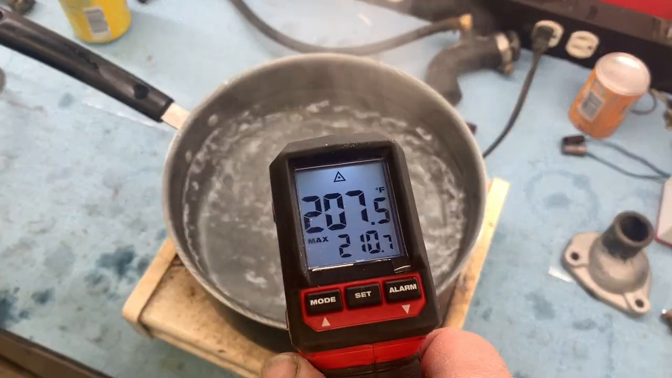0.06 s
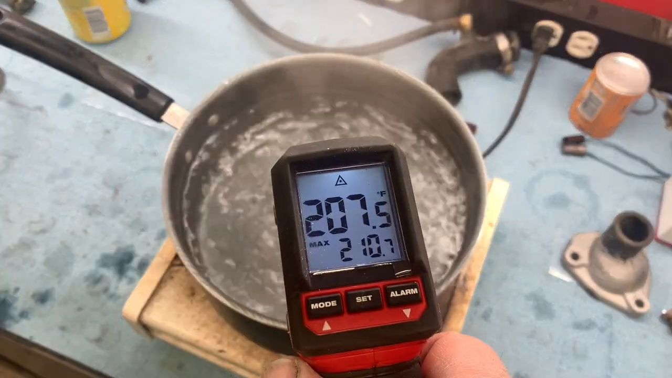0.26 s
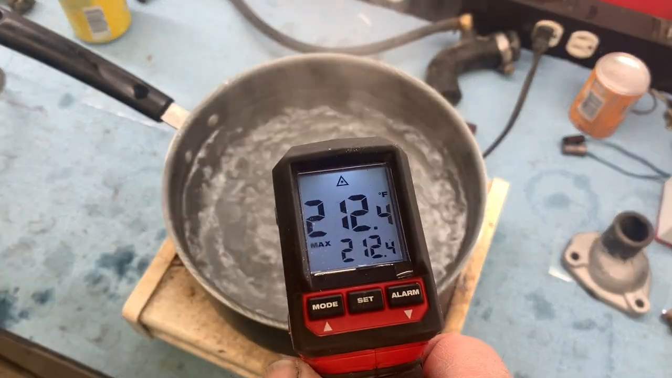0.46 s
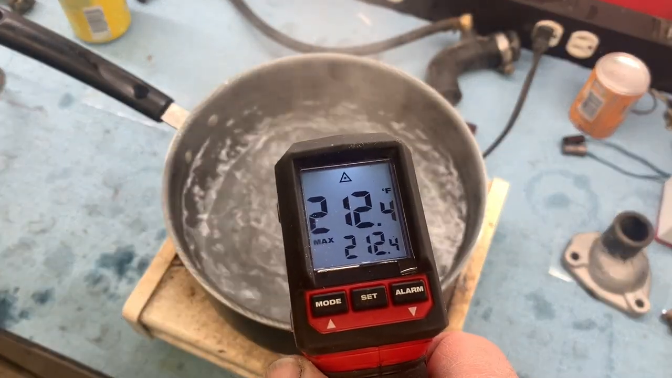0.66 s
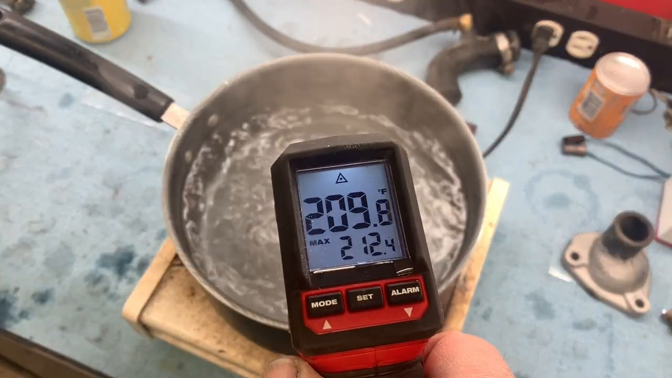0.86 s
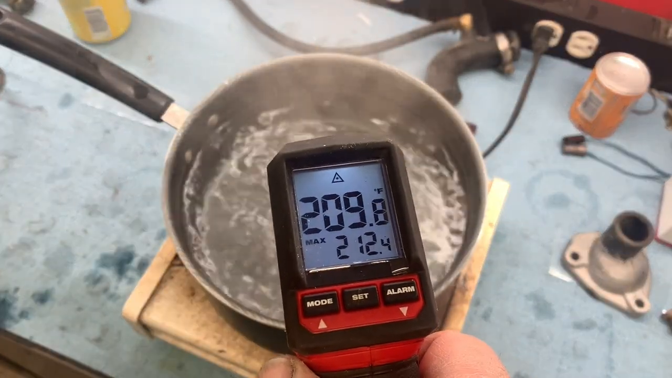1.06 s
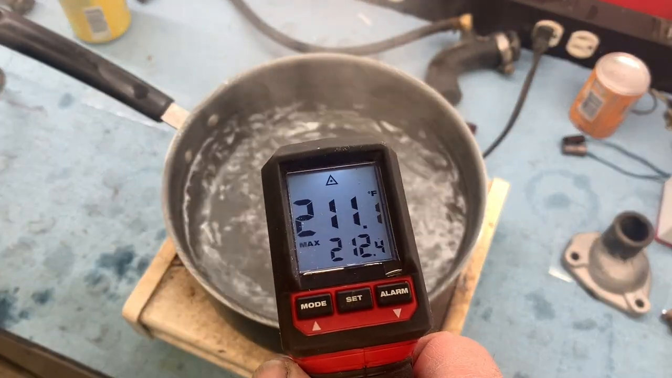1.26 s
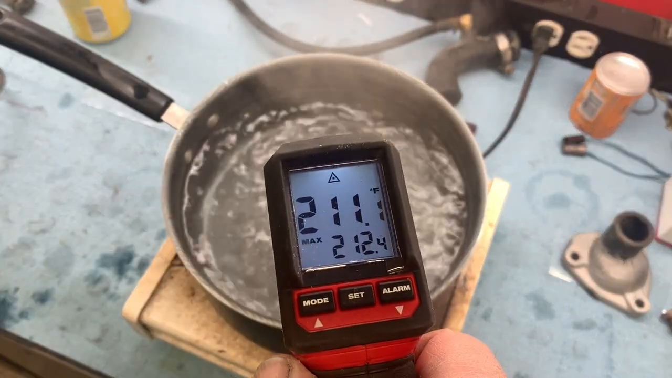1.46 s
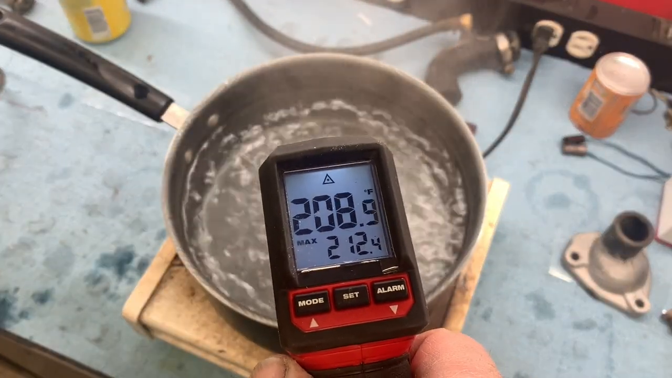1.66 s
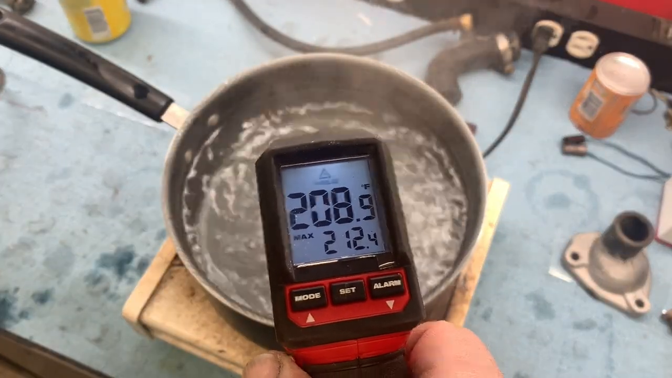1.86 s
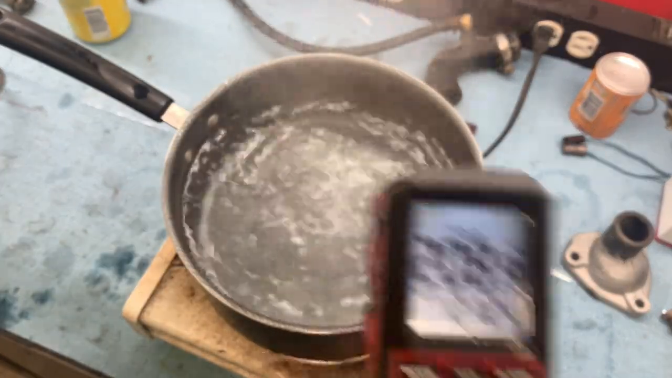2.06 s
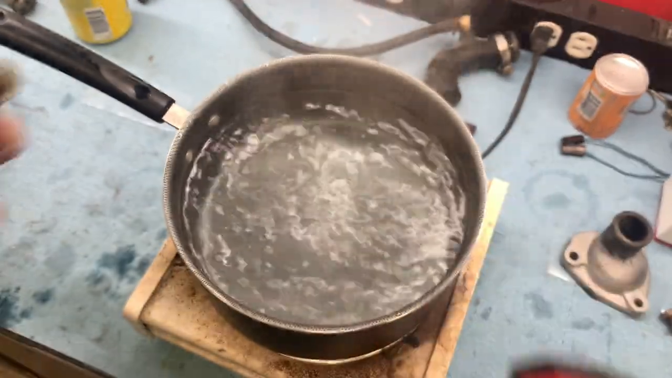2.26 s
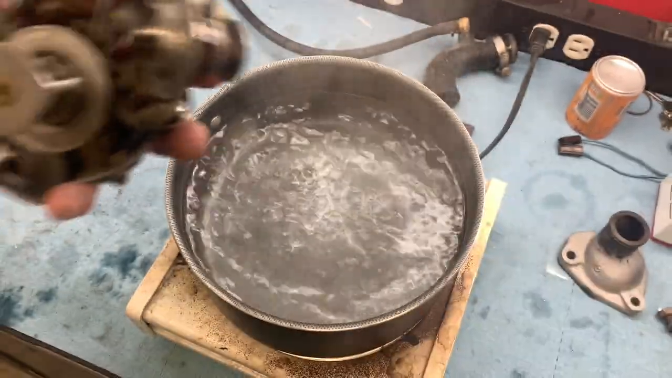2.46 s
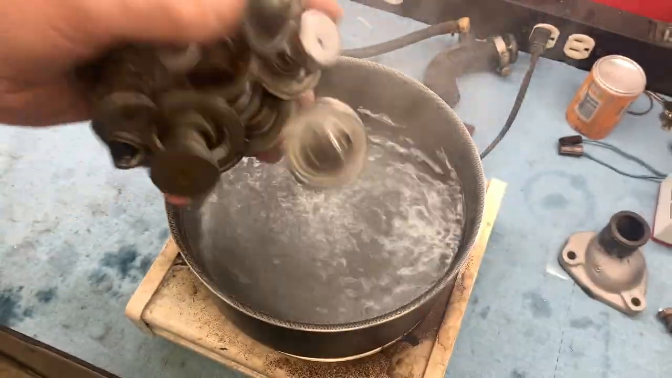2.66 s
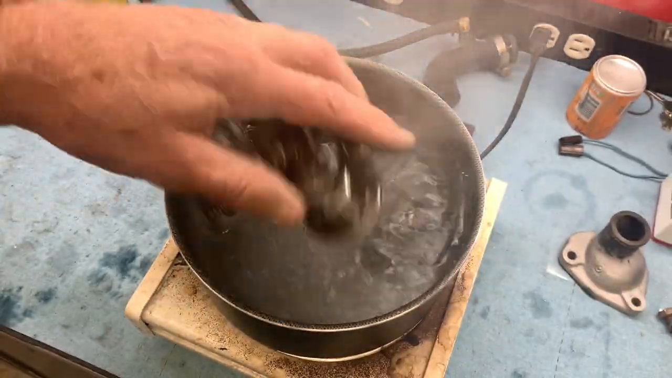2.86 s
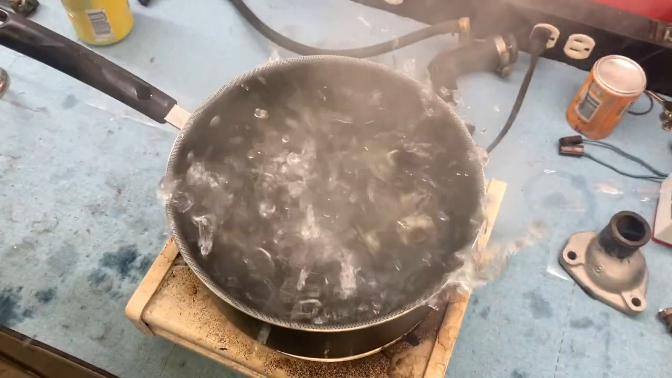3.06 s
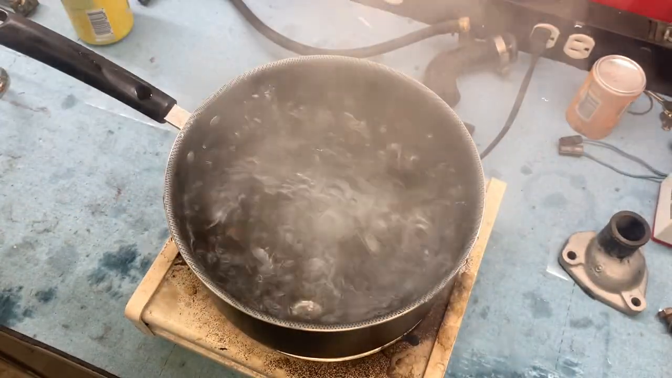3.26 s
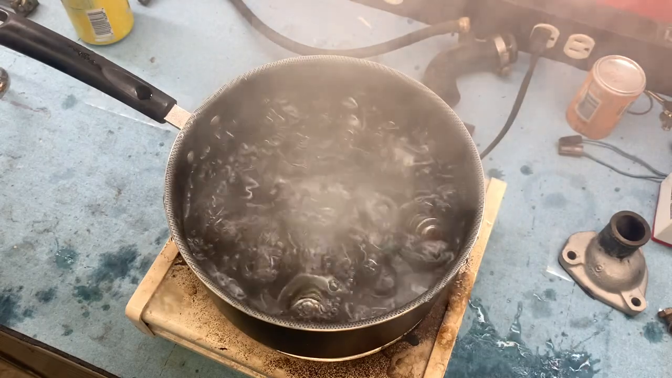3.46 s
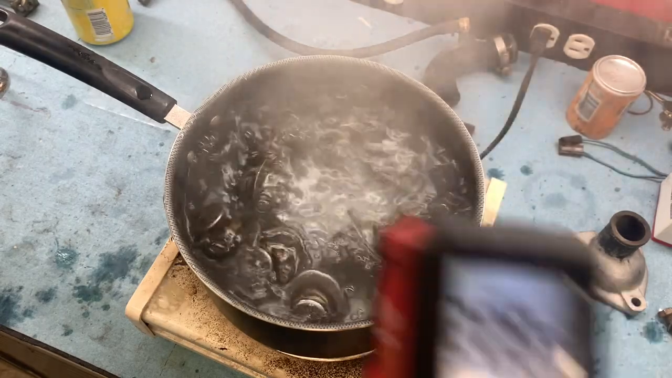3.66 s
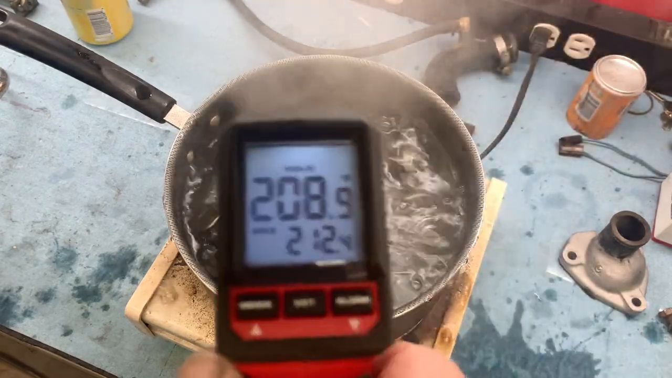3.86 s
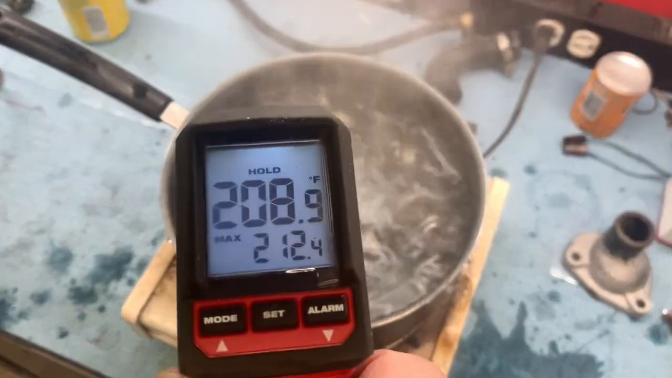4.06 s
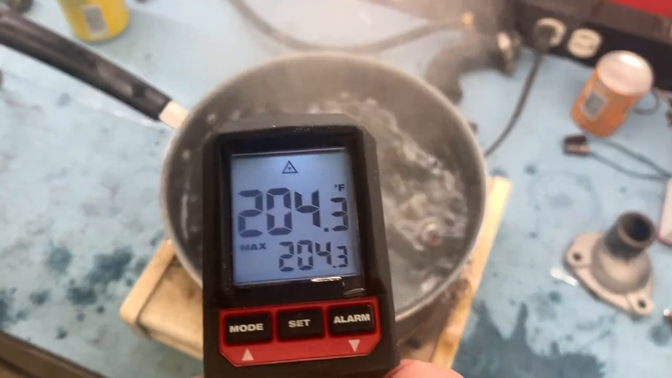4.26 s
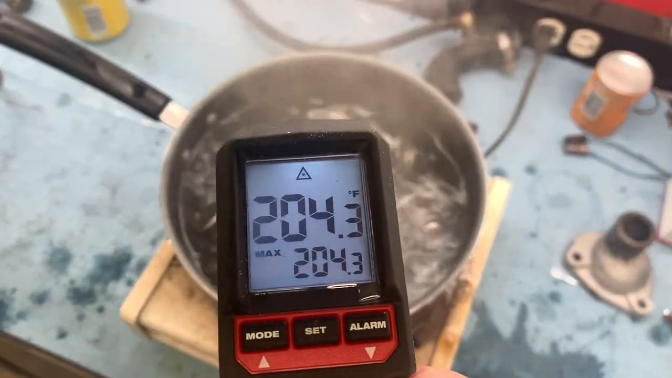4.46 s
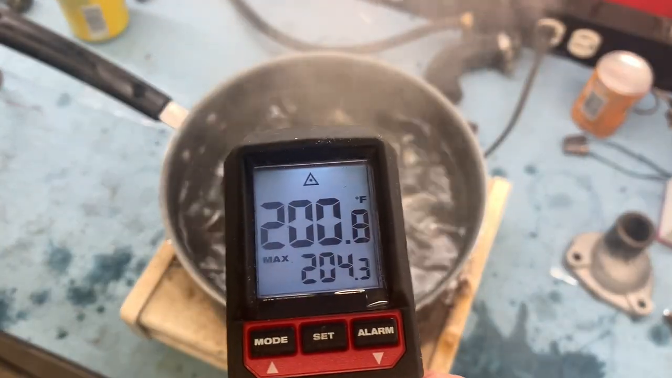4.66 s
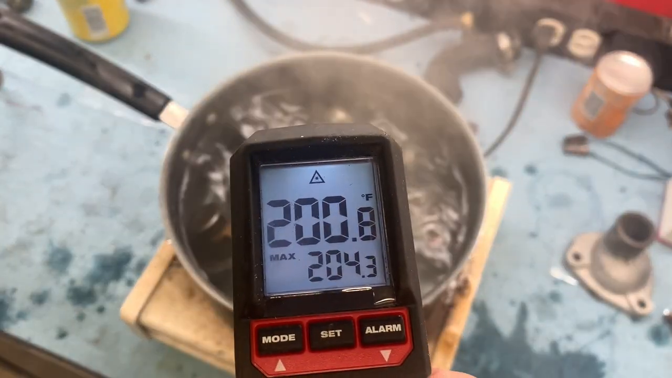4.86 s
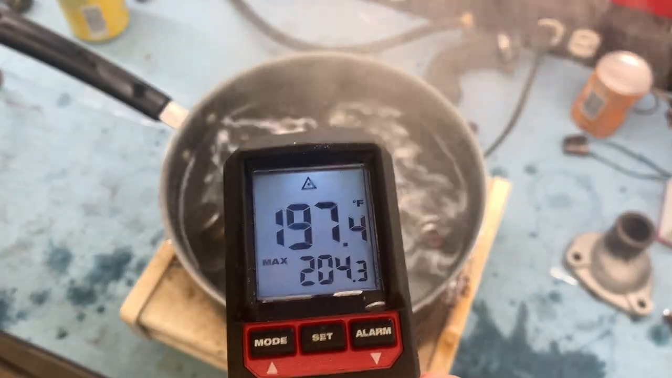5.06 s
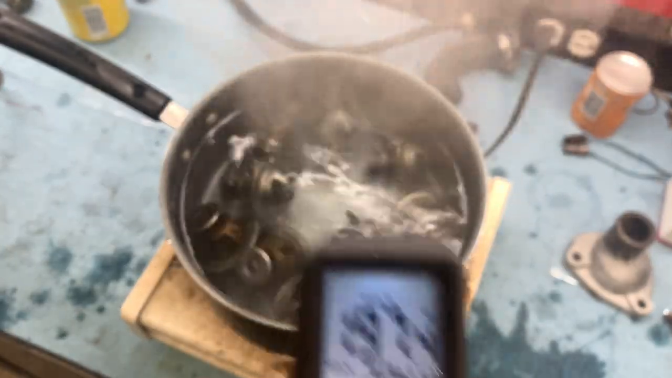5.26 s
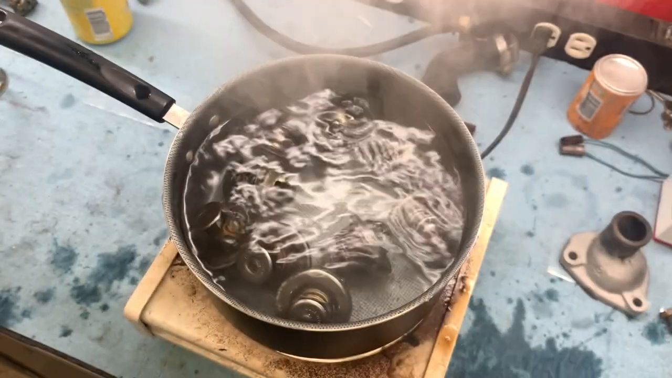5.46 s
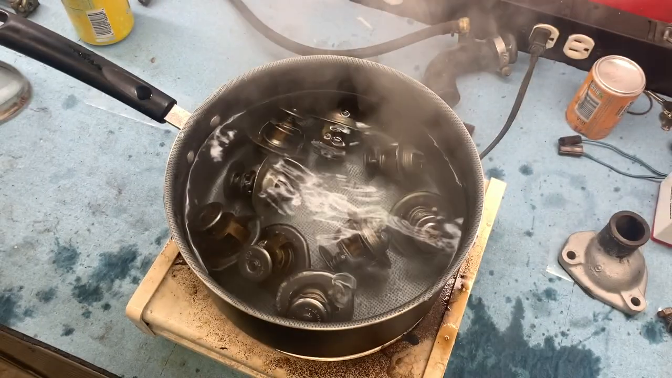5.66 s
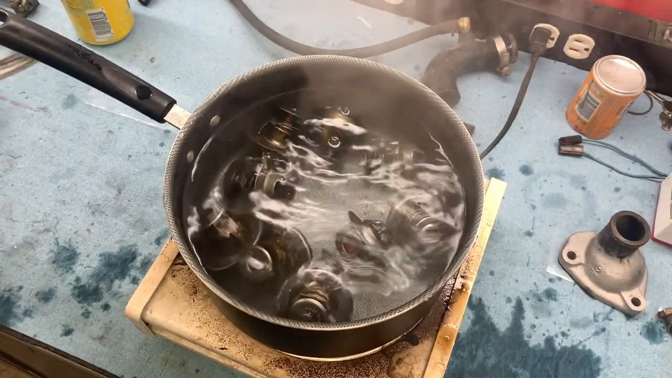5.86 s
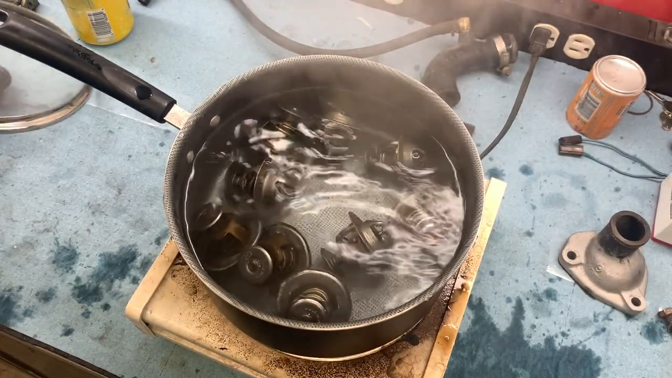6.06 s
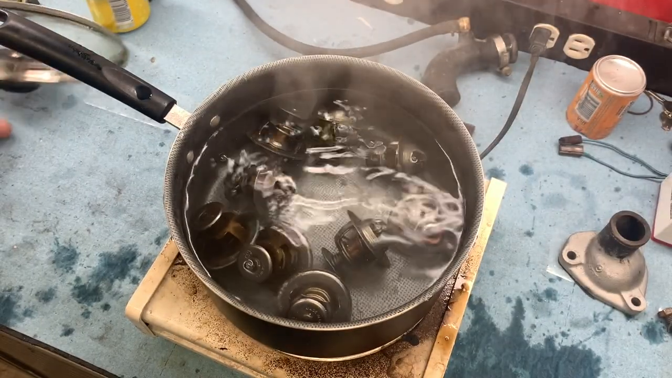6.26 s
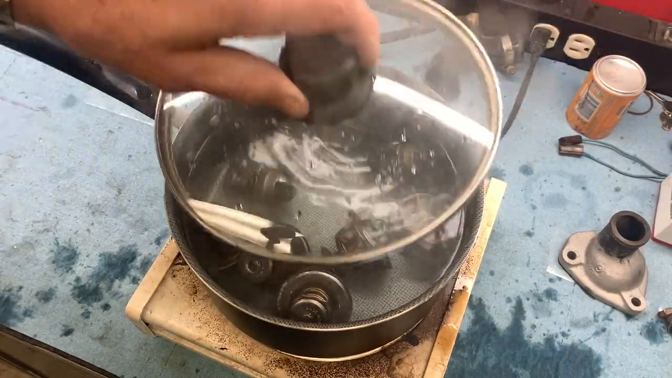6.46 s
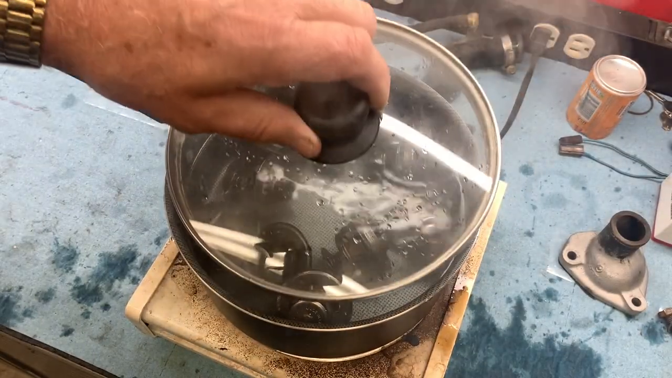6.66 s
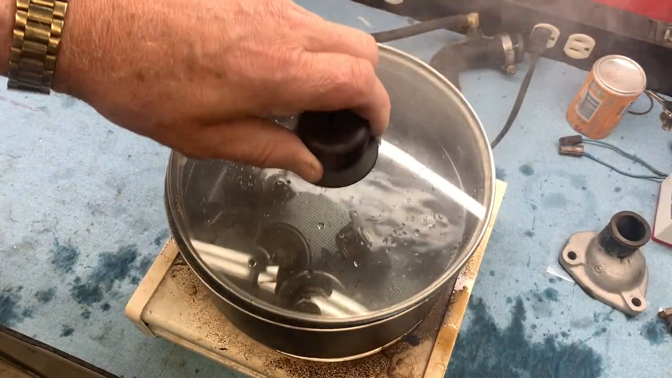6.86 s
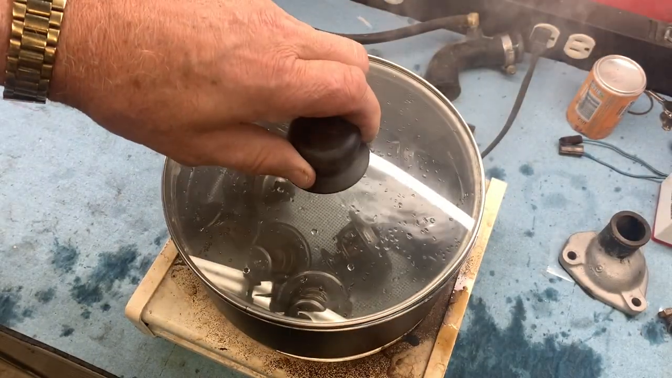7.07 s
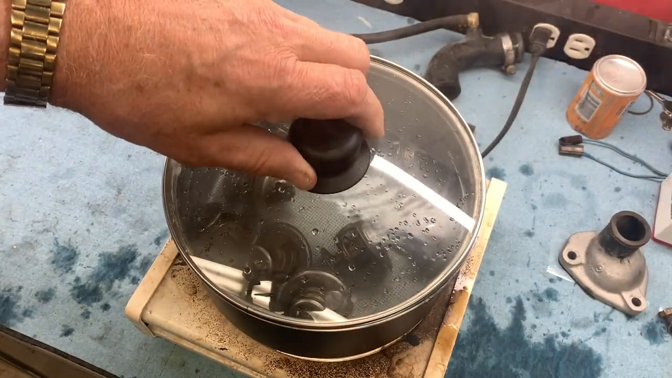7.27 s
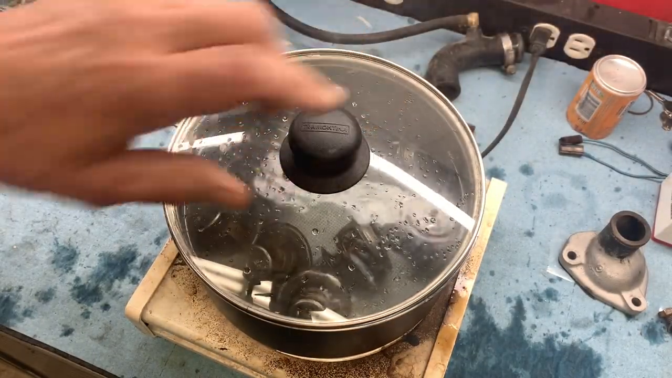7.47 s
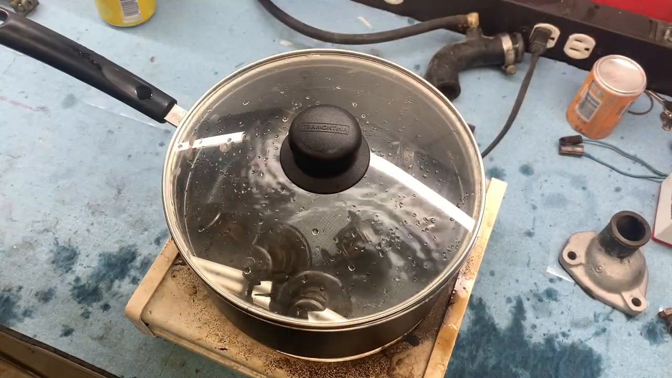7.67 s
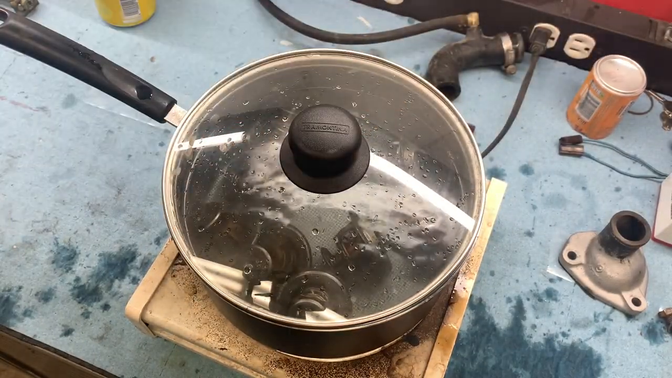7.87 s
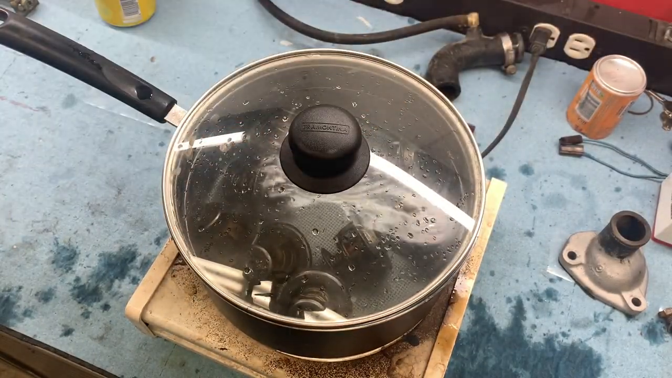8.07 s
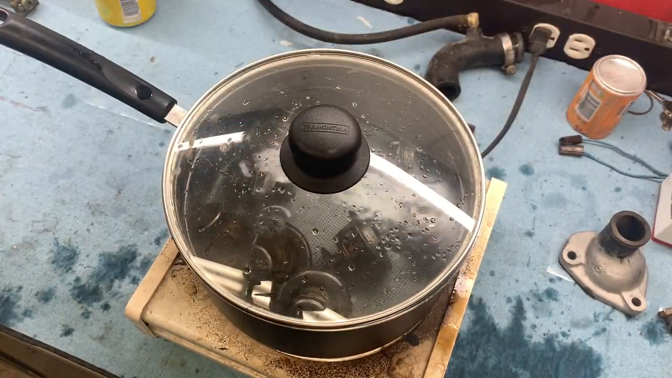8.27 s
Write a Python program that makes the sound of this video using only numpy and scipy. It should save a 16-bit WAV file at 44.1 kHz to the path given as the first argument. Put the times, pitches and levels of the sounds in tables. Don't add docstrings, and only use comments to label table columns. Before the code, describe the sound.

Metal parts clink in a hand, then clatter and splash into a simmering saucepan; hissing water fades to tapping, spitting drops before a glass lid goes on.

```python
import sys
import numpy as np
from scipy import signal
from scipy.fft import rfft, irfft, next_fast_len
from scipy.io import wavfile
from scipy.ndimage import uniform_filter1d

SR = 44100
rng = np.random.default_rng(int(sys.argv[2]) if len(sys.argv) > 2 else 0)


def natural_amplitude(level_db):
    exponent = np.asarray(level_db, float) / 20
    return 10 ** exponent


def wav_record(signal):
    frames = np.transpose(np.atleast_2d(signal))
    bounded = np.clip(frames, -1, 1)
    quanta = np.round(bounded * 32767).astype(np.int16)
    wavfile.write(sys.argv[1], SR, quanta)


N = 366912
LENGTH = next_fast_len(N + SR)
HZ = np.arange(LENGTH // 2 + 1) * SR / LENGTH


def level(x, db):
    return x * natural_amplitude(db) / np.sqrt(np.mean(x ** 2))


def curve(table):
    s, db = np.transpose(table)
    return np.interp(np.arange(N) / SR, s, db)


def gain(points):
    hz, db = np.transpose(points)
    return natural_amplitude(np.interp(np.log(HZ + 1), np.log(hz), db))


def shape(x, response):
    return irfft(rfft(x, LENGTH) * response, LENGTH)[..., :N]


def band(x, lo_hz, hi_hz):
    return signal.sosfilt(signal.butter(2, [lo_hz, hi_hz], "bandpass", fs=SR, output="sos"), x)


def walk(rate):
    k = int(SR / rate)
    held = np.repeat(rng.standard_normal(N // k + 1), k)
    return 1.3 * uniform_filter1d(uniform_filter1d(held, k), k)[:N]


def bursts(s, db, t60, rise_s, bend=0.95):
    out, t = np.zeros(N + SR), np.arange(SR // 4) / SR
    for start, peak, fade in zip(s, db, t60):
        fall = natural_amplitude(peak - 60 * (t / max(fade, .004)) ** bend)
        out[int(start * SR):][:len(t)] += fall * np.minimum(t / rise_s, 1)
    return out[:N]


def ring(push, modes):
    t = np.arange(SR // 3) / SR
    tones = sum(natural_amplitude(db - 60 * t / t60) * np.sin(2 * np.pi * hz * t) for hz, db, t60 in modes)
    return signal.fftconvolve(push, tones)[:N]


def scattered(x):
    z = signal.stft(x, nperseg=256)[2]
    turned = z * np.exp(2j * np.pi * rng.random(z.shape))
    return np.sqrt(2) * signal.istft(turned, nperseg=256)[1][:N]


# (pitch_hz, width_hz, lift_db)
PAN_RESONANCES = [(257, 35, 10), (357.7, 26, 12), (489, 48, 9), (1020, 170, 5), (7070, 1000, 2),
                  (14100, 830, 4.5)]


def pan():
    return 1 + sum((natural_amplitude(db) - 1) / (1 + 2j * (HZ - hz) / width) for hz, width, db in PAN_RESONANCES)


# (start_s, level_db)
DRONE_SWELLS = [(0.0, -40), (0.69, -34.5), (1.32, -56), (1.55, -45.5), (1.81, -37), (2.25, -44.5),
                (3.54, -34.5), (4.12, -43.5), (4.31, -59), (4.45, -42.5), (4.63, -61), (4.75, -43.5),
                (5.23, -55.5), (5.65, -42), (5.9, -53), (6.1, -49.5), (7.55, -60.5), (8.32, -44.5)]
# (times_the_pitch, level_db)
DRONE_OVERTONES = [(2, -15.5), (3.8, -20.5)]
# (pitch_hz, level_db)
RUMBLE_COLOUR = [(20, -33), (35, -21), (60, 16.5), (90, 6), (130, -6.5), (200, -7), (300, -41)]


def drone():
    hz = 64.9 - np.interp(np.arange(N) / SR, (2.6, 5.8), [0, 4.5])
    turn = 2 * np.pi * np.cumsum(hz + 1.0 * walk(11)) / SR
    tone = np.sqrt(2) * np.sin(turn) * natural_amplitude(curve(DRONE_SWELLS) + 0.4 * walk(22))
    overtones = sum(natural_amplitude(db - 43 + 2.87 * walk(6.0)) * np.sin(times * turn) for times, db in DRONE_OVERTONES)
    rumble = level(shape(rng.standard_normal(N), gain(RUMBLE_COLOUR)), -54.5)
    return tone + overtones + rumble


# (start_s, level_db)
WATER_CHURN = [
    (0.0, -61),
    (2.62, -60),
    (2.86, -45.5),
    (2.94, -46),
    (3.08, -48),
    (3.2, -45),
    (3.61, -52),
    (5.35, -56.5),
    (8.32, -58.5),
]
# (pitch_hz, level_db)
WATER_COLOUR = [(100, 6.5), (250, -10.5), (500, -5), (780, -6.5), (1300, -7.5), (1900, -15), (2700, -18.5),
                (5500, -25), (10000, -22.5), (14000, -17)]
# (pitch_hz, width_hz, level_db, share_of_churn_followed)
SINGING_WALLS = [(1041, 98, -5, 2.43), (2258, 116.5, 4, 1.5)]


def boil():
    bubbles, t = np.zeros(N + SR), np.arange(SR // 20) / SR
    for when, pitch, size in rng.random((900, 3)):
        hz = 220 * 9.0 ** pitch
        decay = hz / 2.7
        glide = np.sin(2 * np.pi * hz * t * (1 + 0.056 * decay * t))
        bubbles[int(when * N):][:len(t)] += natural_amplitude(8.4 * size) * np.exp(-decay * t) * glide
    seethe = rng.standard_normal((2, N)) * natural_amplitude(1.1 * walk(20))
    colour = gain(WATER_COLOUR) * pan()
    water = level(shape(seethe[0], colour), 4.9) + level(shape(bubbles[:N], colour), -9.0)
    water_db = curve(WATER_CHURN)

    stir_db = np.minimum(water_db - WATER_CHURN[0][1], 5)
    walls = 0
    for hz, width, db, share in SINGING_WALLS:
        tone = shape(seethe[1], 1 / (1 + 2j * (HZ - hz) / width) ** 2)
        walls = walls + level(tone, db) * natural_amplitude(share * stir_db)
    time = np.arange(N) / SR
    wall_db = -66 + np.interp(time, (5.07, 5.95), [0, 7.5])
    cover_db = np.interp(time, [6.18, 6.3], [0, -14])
    return water * natural_amplitude(water_db), walls * natural_amplitude(wall_db + cover_db + 0.41 * walk(24))


# (start_s,
# crack_db, floor_db, wall_db)
BLOWS = [(2.3205, -41, -61, -77), (2.3341, -30.5, -63, -80), (2.5837, -33, -59, -55),
         (2.607, -35.5, -66, -66), (2.6377, -16, -72, -38), (2.6652, -31, -51, -53),
         (2.7305, -38, -45, -66), (2.744, -21, -36, -50), (2.7755, -6.5, -2, -22.5),
         (2.785, -19, -43, -18.5), (2.8484, -22.5, -32, -32.5), (2.8606, -20, -26.5, -48),
         (2.9173, -6.5, -16, -22), (2.9282, -14, -16.5, -17.5), (2.9483, -7, -13.5, -19),
         (2.9754, -13.5, -22, -20.5), (2.9959, -9.5, -19.5, -16.5), (3.0289, -21, -20.5, -29),
         (3.0519, -13, -15, -26), (3.101, -27, -16.5, -22), (3.1277, -29, -37, -30),
         (3.1594, -25.5, -18.5, -36), (3.2067, -53, -30, -63), (3.2565, -64, -49, -32),
         (1.8404, -43, -46.5, -48), (1.854, -42, -62, -45), (3.9609, -52, -59, -35),
              (4.8985, -44, -64, -43.5), (5.024, -37, -51, -42), (5.257, -39, -37, -44),
              (5.2734, -34.5, -40, -35), (5.366, -34.5, -46, -48.5), (6.135, -20, -48, -31.5),
              (6.1536, -19.5, -35, -33.5), (6.633, -52, -61, -44), (6.8824, -37, -34.5, -56),
              (7.025, -34.5, -30, -33.5), (7.0574, -37, -24.5, -29), (7.0663, -38, -24, -37)]
# (pitch_hz, level_db, fade_60db_s)
FLOOR_MODES = [(140, -6, .07), (359.3, -6.5, .04), (498, -1.5, 0.045), (674, -18.5, 0.039)]
# (pitch_hz, level_db, fade_60db_s)
WALL_MODES = [(890, -7, 0.14), (1077, 3.5, 0.037), (1095, 4, 0.038), (1173, -0.5, 0.034)]
# (pitch_hz, level_db, fade_60db_s)
RIM_MODES = [(1497, -1.5, 0.075), (2270, 4, 0.06), (2963, 3.5, 0.031), (4840, -10, 0.04), (8060, -8, 0.062)]


def knocks():
    s, crack_db, floor_db, wall_db = np.transpose(BLOWS)
    rim_db = 0.43 * crack_db + (1 - 0.43) * wall_db - 5
    t60 = np.where((s > 2.91) & (s < 3.06), 0.1, 0.056)
    noise = rng.standard_normal((4, N))
    bright = gain([(1500, -33), (3500, 0), (6000, -4.5), (9000, -1.5), (15000, -1.5), (16500, 9)])
    crack = level(shape(noise[0], bright * pan()), 0)
    snap = bursts(s, crack_db, t60, 0.0001) + bursts(s, crack_db + 2.5, 0.043 * t60, .0001)
    floor = ring(noise[1] * bursts(s, floor_db - 16, 0.31 * t60, 0.0028, bend=1.67), FLOOR_MODES)
    wall = ring(noise[2] * bursts(s, wall_db - 13.0, 0.18 * t60, 0.0029), WALL_MODES)
    rim = ring(noise[3] * bursts(s, rim_db - 16.5, 0.24 * t60, 0.0016), RIM_MODES)
    rattle = level(band(noise[3], 1260, 2900), 0) * bursts(s, rim_db - 1.5, 1.47 * t60, 0.001)
    slosh = level(band(noise[1], 330, 760), 0) * bursts(s, floor_db - 9.5, 2.0 * t60, 0.027)
    return crack * snap + band(floor + wall, 192, 7100) + rim + rattle + slosh


# (pitch_hz, level_db, fade_60db_s)
TRIGGER_MODES = [(1300, -3, 0.024), (2180, -7, 0.018), (2980, -5, .012), (3990, 2.5, 0.01),
                 (4780, 1.5, .012), (5960, -6, .012)]
# (start_s, peak_db)
LID_TOUCHES = [
    (6.137, -39.5),
    (6.156, -41),
    (6.2, -56),
    (6.245, -47.5),
    (7.059, -62),
]
# (pitch_hz, level_db, fade_60db_s)
LID_MODES = [(880, -4.5, 0.1), (972, -2.5, 0.13), (945, -4, 0.14), (780, -3, 0.064)]


def trigger_and_lid():
    click, taps = np.zeros(N), np.zeros(N)
    click[int(1.8525 * SR)] = natural_amplitude(-33)
    s, db = np.transpose(LID_TOUCHES)
    taps[(s * SR).astype(int)] = natural_amplitude(db)
    scuff = rng.standard_normal(N) * bursts(s, db - 26, 0 * s + 0.16, 0.0014)
    return ring(taps * .5 + scuff, LID_MODES) + ring(click, TRIGGER_MODES)


# (start_s, level_db)
HISS_LEVEL = [(2.28, -74), (2.65, -61), (2.9, -48.5), (3.1, -47.5), (3.19, -60.5), (3.24, -40), (3.45, -46),
              (3.91, -50.5), (4.38, -50.5), (4.85, -59.5), (5.27, -64), (5.59, -55), (6.08, -52),
              (6.4, -58), (6.65, -52.5), (6.9, -61.5), (7.6, -68), (8.32, -68.5)]
# (pitch_hz, level_db)
STEAM_COLOUR = [(200, -4.5), (500, -17.5), (1300, -1.5), (3000, 5), (5500, 2.5), (8000, 2), (11000, 5),
                (15000, 5.5), (16500, 8.5)]
# (start_s, length_s)
DROP_LIFTS = [
    (6.335, 0.015),
    (6.376, 0.0098),
    (6.449, 0.012),
]
# (first_s, last_s, beat_s, peak_db, body_db)
ROCKING_DROPS = [(5.265, 5.446, .030, -45, -7), (5.51, 5.826, .0356, -30, -27.5),
                 (5.95, 6.139, .0467, -31, -31), (6.242, 6.304, .0325, -24, -18),
                 (6.348, 6.42, .032, -22, -49), (6.463, 6.566, .0347, -25, -23),
                 (6.65, 6.865, .0352, -29, -21), (6.908, 6.965, .027, -42, -3.5),
                 (7.005, 7.041, .035, -28, -9.5), (7.104, 7.213, .0347, -31.5, -15.5),
                 (7.237, 7.44, .0343, -32.5, -13), (7.486, 7.532, .043, -40, 1),
                 (7.59, 7.59, .034, -41, -7), (7.626, 7.73, .0343, -31, -14),
                 (7.759, 7.862, .0337, -32, -11.5), (7.887, 7.985, .0333, -34, -8.5),
                 (8.034, 8.068, .034, -25.5, -17.5), (8.101, 8.285, .0362, -38, -13.5)]


def sizzle():
    hiss_db = curve(HISS_LEVEL)
    t = np.arange(N) / SR
    dryness = np.interp(t, [4.6, 5.4], [0, 1])
    sizes = np.repeat(np.minimum(rng.exponential(size=N // 8 + 1), 6), 8)[:N]
    grains = rng.standard_normal(N) * natural_amplitude((1.27 + 1.9 * dryness) * sizes)
    grains = grains * (t > HISS_LEVEL[0][0]) / np.sqrt(uniform_filter1d(grains ** 2, 4000))
    for start, length in DROP_LIFTS:
        grains[int(start * SR):int((start + length) * SR)] *= .3

    spits = []
    for first, last, beat, peak, body in ROCKING_DROPS:
        count = round((last - first) / beat) + 1
        spits += [(when, peak, body) for when in np.linspace(first, last, count)]
    s, peak_db, body_db = np.transpose(spits)
    chance = rng.standard_normal((2, len(s)))
    peak_db = peak_db + 4 * chance[0]
    lasts_s = 0.023 * natural_amplitude(0.4 * chance[1])

    body = natural_amplitude(hiss_db + 10) + bursts(s, peak_db + body_db - 5.5, 1.88 * lasts_s, 0.0026, bend=2.83)
    bright_db = hiss_db - 8 + 18 * dryness
    top = natural_amplitude(bright_db - 8.0) * (0.26 + 0.72 * dryness)
    top = top + bursts(s, peak_db - 22.5, lasts_s, 0.00043, bend=3.4)
    low = level(shape(grains, gain(STEAM_COLOUR) * pan()), 0) * body
    high = level(band(band(grains, 10200, 16460), 10660, 15430), 0) * top
    echo = (0.089 + 0.19 * dryness) * np.roll(low, int(.00154 * SR))
    return high + low - echo


# (start_s, peak_db, fade_60db_s)
HAND_RUBS = [
    (2.34, -48, 0.22),
    (2.46, -50.5, 0.59),
]


def rubs():
    return level(band(rng.standard_normal(N), 3000, 3940), 0) * bursts(*np.transpose(HAND_RUBS), .02)


# (start_s, peak_db)
STEAM_POPS = [(5.616, -30), (6.004, -26), (6.236, -26), (6.2645, -27), (6.323, -24), (6.4392, -35),
              (7.347, -27), (7.4125, -31), (7.5335, -25), (7.6255, -28), (7.763, -21.5), (7.7994, -28),
              (7.827, -28), (7.9, -32), (8.0674, -30), (8.109, -31), (2.7428, -14.5), (3.0528, -14.5),
              (3.1024, -27.5), (6.4631, -22)]


def pops():
    push = np.zeros(N)
    s, db = np.transpose(STEAM_POPS)
    push[(s * SR).astype(int)] = natural_amplitude(db + 13.5)
    return shape(push, gain([(1000, -14), (5000, -14), (12000, -1), (15000, 11.5), (16500, 17)]))


# (start_s, peak_db, pitch_hz, fade_60db_s)
BENCH_BUMPS = [(2.777, -20, 188, 0.15), (2.928, -32, 135, 0.1), (3.002, -20.5, 191, 0.15),
               (5.463, -29.5, 140, 0.069), (5.584, -28.5, 151, 0.13), (5.619, -31, 130.6, 0.16),
               (5.816, -33, 119, 0.095), (5.988, -27, 141, 0.11), (6.162, -25.5, 143, 0.059),
               (6.891, -42, 196, 0.21), (7.065, -28, 270, 0.12), (7.058, -31.5, 86, .15),
               (2.784, -23.5, 140, 0.12)]


def bumps():
    out, t = np.zeros(N + SR), np.arange(SR // 3) / SR
    for s, db, hz, t60 in BENCH_BUMPS:
        thud = natural_amplitude(db - 60 * t / t60) * np.sin(2 * np.pi * hz * t)
        out[int(s * SR):][:len(t)] += thud * np.minimum(t / 0.0068, 1)
    return out[:N]


def room(hits):
    t = np.arange(SR // 2) / SR
    tail = band(rng.standard_normal((2, len(t))), 280, 7000) * natural_amplitude(-41.5 - 60 * t / 0.42) * (t > .004)
    wash = signal.fftconvolve(hits[None], tail, axes=1)[:, :N]
    return np.array([scattered(side) for side in wash])


# (pitch_hz, likeness_0_to_1)
PORT_LIKENESS = [(60, .97), (300, .97), (1000, .9), (1700, .6), (3100, .68), (4500, .45), (6500, .6),
                 (8500, .82), (16000, .82)]
# (pitch_hz, left_minus_right_db)
PORT_BALANCE = [(60, 1.8), (380, .8), (800, -1), (2400, 1.5), (4800, 3.5), (6500, 0)]


def two_ports(near, direct):
    hz, alike = np.transpose(PORT_LIKENESS)
    alike = np.clip(np.interp(np.log(HZ + 1), np.log(hz), alike), 0, 1)
    same = shape(direct, np.sqrt((1 + alike) / 2))
    other = shape(scattered(near), np.sqrt((1 - alike) / 2))
    half = np.sqrt(gain(PORT_BALANCE))
    lag = np.exp(-2j * np.pi * HZ * .000153)
    return np.array([shape(same + other, half * lag), shape(same - other, 1 / half)])


def scene():
    hits = knocks() + bumps() + trigger_and_lid()
    water, walls = boil()
    near = water + sizzle() + pops() + hits + rubs()
    direct = near + walls + drone()
    air = level(band(rng.standard_normal((2, N)), 2600, 3000), -80.5)
    return two_ports(near, direct) + room(hits) + air


# (pitch_hz, weaker_by_db)
STEREO_DROP = [(0, 90), (2000, 30), (2700, 6.5), (4500, 6), (6500, 7), (8700, 1.8), (10300, 5.5),
               (12000, 5.5), (13800, 2.5)]


def joint_stereo(x):
    mix = np.array([[1, 1], [1, -1]]) / np.sqrt(2)
    hz, _, z = signal.stft(mix @ x, SR, "hann", nperseg=2048, noverlap=1024)
    edges = np.r_[0, (96 * 1.1 ** np.arange(13)).astype(int), 320:1024:32]
    power = np.add.reduceat(np.abs(z) ** 2, edges, axis=1) + 1e-18
    need_db = np.interp(hz[edges], *np.transpose(STEREO_DROP))[:, None]
    keep = power * natural_amplitude(2 * need_db) > power[::-1]
    treble = power[:, 14:].sum(axis=(0, 1))
    keep = keep | (treble > natural_amplitude(11) * np.roll(treble, 1))
    z = z * np.repeat(keep, np.diff(np.r_[edges, len(hz)]), axis=1)
    return mix @ signal.istft(z, SR, "hann", nperseg=2048, noverlap=1024)[1][:, :N]


def top_cut(x):
    return signal.sosfilt(signal.butter(12, 16810, fs=SR, output="sos"), x)


# (pitch_hz, level_db)
PHONE_TOP = [(14900, 0.5), (15500, -28), (16200, -31.5), (17000, -49)]


def record(dry):
    rounded = np.tanh(shape(dry, gain(PHONE_TOP)))
    mix = joint_stereo(rounded)
    return top_cut(mix)


dry = scene()
out = record(dry)
wav_record(out)
```